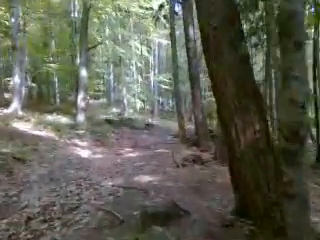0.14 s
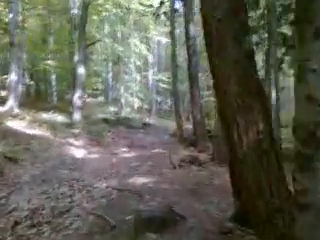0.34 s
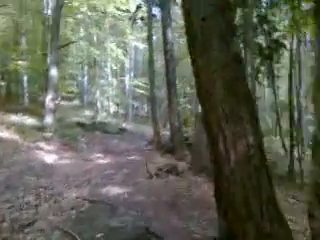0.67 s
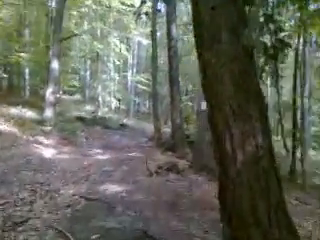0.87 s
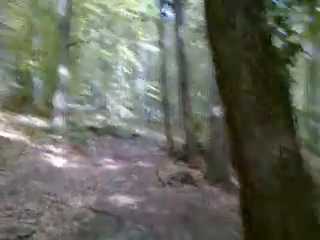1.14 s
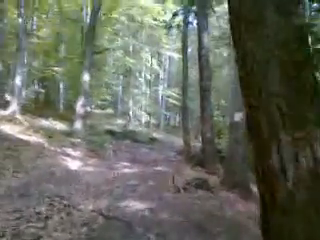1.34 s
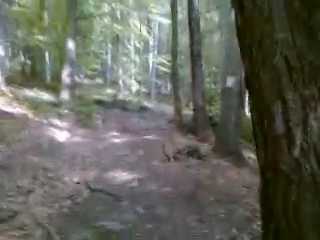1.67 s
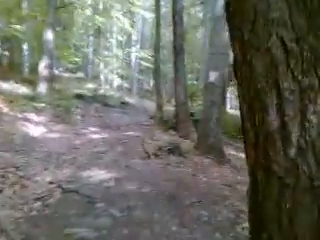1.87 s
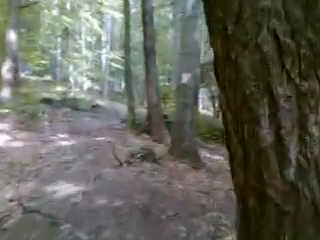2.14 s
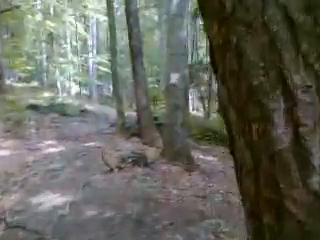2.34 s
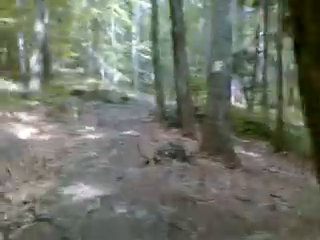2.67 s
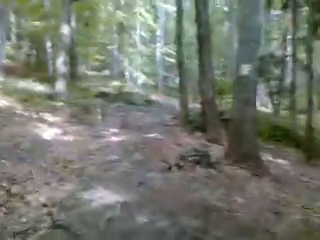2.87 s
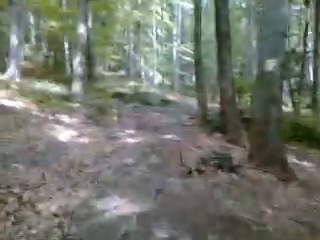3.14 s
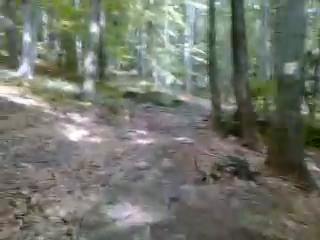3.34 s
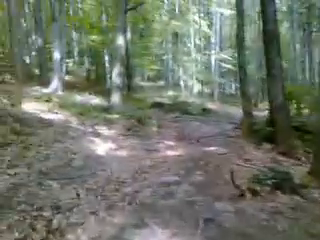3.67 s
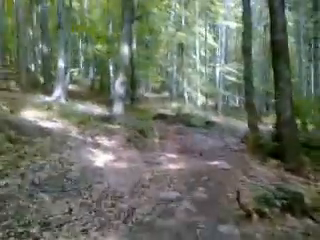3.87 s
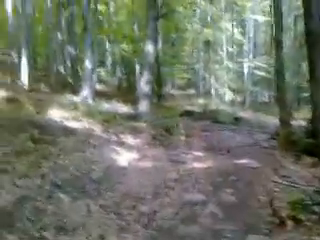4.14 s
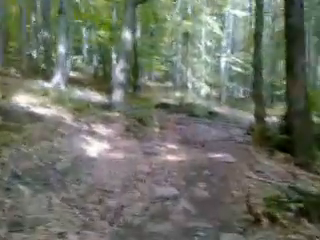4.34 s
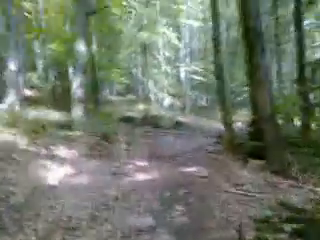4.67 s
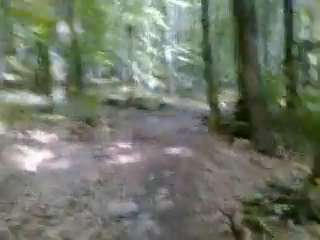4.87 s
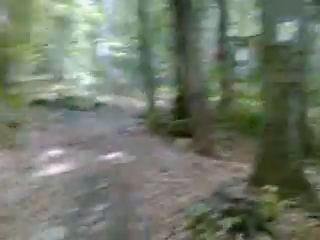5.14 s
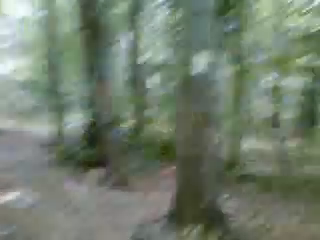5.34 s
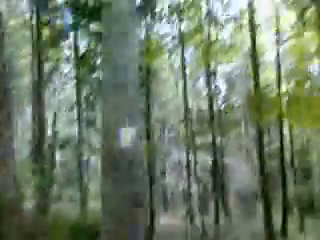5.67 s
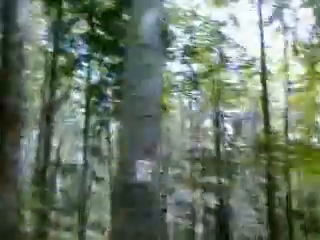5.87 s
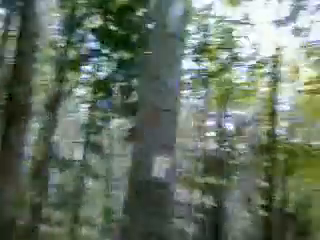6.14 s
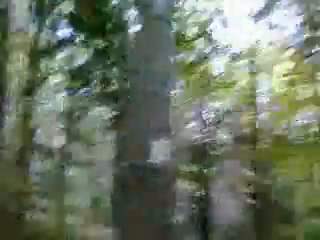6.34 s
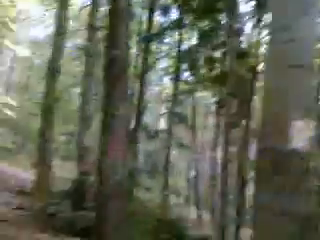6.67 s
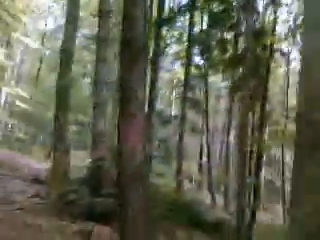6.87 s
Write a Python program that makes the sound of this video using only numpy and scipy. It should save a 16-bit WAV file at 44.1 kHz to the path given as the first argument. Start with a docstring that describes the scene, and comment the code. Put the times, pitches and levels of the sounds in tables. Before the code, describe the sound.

A walker moves along a quiet woodland path, heard from a carried microphone with a narrow, slightly rough treble. Faint leaf scuffs and a small twig click open the scene. From about 0.3 seconds a finch gives four short falling whistles, each louder, with a sharp twig crack near 0.6, then a fast trill from 0.8 to 1.2 and a buzzy, sliding flourish until about 2.3, all with diffuse woodland echo. Crunching leaves and soil swell between 1.3 and 2.0, then thin to sparse scuffs. Brittle snaps strike around 3.25 and 4.1. From 4.3 the steps grow denser, with a cluster of cracks near 4.7 and a strong snap at 5.2, plus low thuds around 5.5 and 6.0. Scuffing continues to the end, where another bird gives quick high chirps at 6.7 to 6.95. Soft air and slight handling rumble remain underneath.

```python
"""A walker treads a forest path: shoes scuff dry leaves and soil, twigs snap and feet thud throughout.
A finch soon opens with four rising-level whistles, then sings a fast trill and a buzzy flourish.
Steps carry on, crunchy noise with short cracks and low thumps, until a second bird chirps near the end.
Birds are gliding sine tones with a diffuse echo. Soft air lies under all, and thumps bring rumble.
The overall tone has two treble peaks, narrow dips and a steep top end."""
import sys
import numpy as np
from scipy import signal
from scipy.fft import rfft, irfft, next_fast_len
from scipy.io import wavfile
from scipy.ndimage import uniform_filter1d, map_coordinates

SR = 44100
rng = np.random.default_rng(int(sys.argv[2]) if len(sys.argv) > 2 else 0)


def natural_amplitude(level_db):
    """Convert a level in decibels to a linear amplitude factor, elementwise."""
    exponent = np.asarray(level_db, float) / 20
    return 10 ** exponent


def bounce(signal):
    """Save signal as a 16-bit WAV file at the path given by the first command-line argument."""
    frames = np.transpose(np.atleast_2d(signal))
    limited = np.clip(frames, -1, 1)
    pcm = np.round(limited * 32767).astype(np.int16)
    wavfile.write(sys.argv[1], SR, pcm)


N = 308372

# The sole scuffing through litter, levels before the press curve:
# start_s, length_s, crisp_leaves_level_db, dull_soil_level_db
SCUFF_EVENTS = [(0.183, 0.053, -51, -53), (0.751, 0.041, -41.5, -44), (0.787, 0.38, -60, -61),
                (0.796, .045, -43, -64), (0.965, 0.05, -43, -37), (1.049, 0.21, -56.5, -51.5),
                (1.272, 0.08, -51.5, -53), (1.364, 0.056, -39, -34), (1.424, 0.093, -34.5, -41.5),
                (1.525, 0.24, -47, -47), (1.665, 0.14, -33, -34.5), (1.794, 0.082, -31, -35.5),
                (1.868, 0.14, -42, -77), (1.964, 0.085, -34, -61), (2.348, 0.031, -39.5, -58),
                (2.406, 0.046, -89, -48.5), (2.739, 0.075, -62, -56.5), (2.864, 0.038, -62.5, -42),
                (2.985, 0.01, -54, -43.5), (3.023, 0.097, -49, -56.5), (3.179, 0.049, -43, -58),
                (3.238, 0.022, -32, -31.5), (3.38, 0.036, -52, -48.5), (3.522, 0.027, -49, -49),
                (3.982, 0.023, -47, -44.5), (4.019, 0.1, -59, -51), (4.106, 0.041, -28, -30),
                (4.277, .12, -35.5, -36.5), (4.451, 0.08, -43, -50.5), (4.685, 0.067, -37, -46.5),
                (4.764, 0.028, -28, -33.5), (4.86, 0.055, -40, -42.5), (4.966, 0.039, -46.5, -51),
                (5.083, 0.056, -39.5, -69.5), (5.135, 0.07, -41.5, -69.5), (5.19, 0.065, -33, -37),
                (5.266, 0.096, -32.5, -43), (5.476, 0.062, -32, -32), (5.546, 0.15, -43, -50.5),
                (5.667, 0.079, -43, -37.5), (5.723, 0.1, -42, -46), (5.813, 0.12, -45.5, -48.5),
                (5.948, 0.04, -73, -44), (5.992, 0.064, -36, -44), (6.186, 0.12, -51.5, -50.5),
                (6.389, 0.13, -35.5, -40), (6.487, 0.1, -42.5, -46.5), (6.645, 0.071, -43, -49.5),
                (6.729, 0.043, -65.5, -48), (6.78, 0.093, -42, -42)]
# Twigs and leaf ribs breaking, relative crack and knock levels: start_s, crack_level_db, knock_level_db, knock_hz
SNAP_EVENTS = [(0.157, -48.5, -46, 820), (0.1976, -46, -41, 800), (0.2147, -31, -63, 1540),
               (.336, -46, -46.5, 1650), (0.5254, -62, -40.5, 1920), (0.5828, -11.5, -26, 2330),
               (1.1685, -41, -24, 1680), (1.293, -32.5, -35.5, 1160), (1.381, -26, -23, 1390),
               (1.4488, -18, -10, 2330), (1.505, -32, -27, 1230), (2.183, -50, -41, 1760),
               (2.791, -43, -51, 1460), (3.2532, -11, -12, 1207), (3.3648, -37.5, -46, 1690.0),
               (3.462, -78.5, -39.5, 1000), (3.711, -53, -25.5, 965), (4.1162, -17.5, -19.5, 1880),
               (4.5227, -38, -27.5, 1490), (4.668, -56, -37, 3750), (4.6925, -14, -53, 1800),
               (4.712, -12.5, -17.5, 1450), (4.7282, -34, -25, 880), (4.772, -3.5, -18, 1360),
               (4.8887, -26, -21.5, 1770), (5.0231, -48.5, -32, 1680), (5.2092, -5, -9, 1730),
               (5.4741, -52, -39, 1250), (5.4901, -36, -26, 900), (5.993, -55, -24.5, 1810),
               (6.388, -29, -54, 1560), (6.401, -20.5, -35, 1510), (6.788, -25.5, -26.5, 1140)]
# Low thumps of the steps and the low body of some snaps, levels at the source:
# start_s, peak_level_db, pitch_hz
THUMP_EVENTS = [(0.049, -39, 270), (1.078, -39.5, 595), (1.127, -37.5, 427), (1.167, -32, 784),
                (1.292, -38, 564), (1.38, -34, 420), (1.447, -24, 910), (2.109, -52, 160),
                (2.161, -47.5, 283), (2.66, -41, 370), (3.349, -40.5, 199), (3.402, -29.5, 216),
                (3.458, -45, 183), (3.706, -35.5, 230), (4.028, -35, 316), (4.056, -41, 189),
                (4.091, -39, 382), (4.589, -27.5, 191), (4.722, -30.5, 330), (5.203, -30.5, 450),
                (5.495, -23, 740), (5.895, -38, 280), (5.993, -22.5, 226), (6.554, -29.5, 243),
                (6.782, -35, 370), (6.881, -47, 293)]
# The pair of notes that the trill repeats, nominal pitch and level:
# delay_s, length_s, from_hz, to_hz, level_db, growth_per_repeat_db
TRILL_PAIR = [(0, 0.016, 3980, 3554, -38, 1.16), (0.014, 0.023, 2910, 3545, -38, 0.5)]
# Single clear whistles, nominal pitch and level: start_s, length_s, from_hz, to_hz, level_db
CLEAR_WHISTLES = [(1.218, 0.029, 3806, 3980, -33), (1.239, 0.075, 4750, 4640, -43),
                  (1.268, 0.017, 3440, 3695, -29), (6.724, 0.021, 3650, 5400, -41.5),
                  (6.745, 0.0232, 4950, 4220, -34.5), (6.886, 0.022, 3520, 5400, -36),
                  (6.904, 0.02, 4850, 3850, -34.5), (6.934, 0.018, 5170, 5830, -44.5)]
# Buzzy notes, nominal pitch and level: start_s, length_s, from_hz, to_hz, level_db
BUZZY_NOTES = [(.395, 0.091, 6300, 5570, -58), (.685, 0.11, 6350, 5450, -54),
               (1.29, 0.084, 3535, 2720, -35.5), (1.46, 0.17, 3530, 2950, -40), (1.9, .19, 3276, 4260, -41),
               (2.085, 0.12, 5640, 4610, -42), (2.17, 0.14, 3770, 2720, -44)]
# Tone of crisp leaves and twig cracks: frequency_hz, gain_db
LEAF_TONE = [(150, -38.5), (1200, -10), (2600, 0), (4000, 5.5), (7000, 4.5), (9000, -6.5)]
# Tone of dull soil under the sole: frequency_hz, gain_db
SOIL_TONE = [(110, -30.5), (200, -10), (700, -5), (1100, -3.5), (1900, 0), (3200, -10), (7000, -13)]
# Tone of the soil crumbling under the thumps: frequency_hz, gain_db
CRUMB_TONE = [(105, -28.5), (165, 2), (400, 4), (800, -5), (2500, -52)]
# Tone of the still forest air: frequency_hz, gain_db
AIR_TONE = [(20, -32), (40, -16), (60, 1.5), (100, -19), (170, -5.5), (450, -10), (1100, -18), (2500, -13)]
# Tone of the handling rumble: frequency_hz, gain_db
RUMBLE_TONE = [(20, -14.5), (45, -4.0), (75, -13.0), (95, -27.0), (140, -53)]
# Overall tone: two treble peaks, narrow dips at 7 and 8 kHz, steep top end: frequency_hz, gain_db
OVERALL_TONE = [(2600, -5.5), (3850, 1.5), (5200, -11.5), (6400, 0), (6850, -4.5), (7000, -27.5),
                (7300, -6), (7750, -15), (8000, -44), (8400, -17.5), (8800, -27.5), (9300, -85)]


def unit(x):
    """Scales a signal to an rms of 1."""
    return x / np.sqrt(np.mean(x ** 2) + 1e-20)


def coloured(x, points):
    """Causal minimum-phase filter through frequency_hz, gain_db points, built from the cepstrum."""
    m = 2 * next_fast_len(N // 2 + 8192)
    f, db = np.transpose(points)
    gain_db = np.interp(np.log(np.fft.rfftfreq(m, 1 / SR) + 1), np.log(f + 1), db)
    cepstrum = irfft(np.log(natural_amplitude(gain_db)), m)
    cepstrum[1:m // 2] *= 2
    cepstrum[m // 2 + 1:] = 0
    response = np.exp(rfft(cepstrum))
    return irfft(rfft(x, m) * response, m)[:N]


def add(into, start_s, x):
    """Mixes x in from its start time."""
    part = into[round(start_s * SR):][:len(x)]
    part += x[:len(part)]


def wobble(rate):
    """A smooth random curve with rate knots a second."""
    knots = rng.standard_normal(int(N * rate / SR) + 4)
    return map_coordinates(knots, [np.arange(N) * rate / SR])


def hump(cycles, peak):
    """Swells to 1 after peak cycles, then dies."""
    return cycles / peak * np.exp(1 - cycles / peak)


def crunch(points, per_second, spread_db, hiss, patchy_db):
    """Tiny breaks of uneven size on a hiss, in patches of time and frequency."""
    size_db = spread_db * np.minimum(rng.exponential(1, N), 4)
    breaks = (rng.random(N) < per_second / SR) * natural_amplitude(size_db) * rng.standard_normal(N)
    grains = unit(breaks) + hiss * rng.standard_normal(N)
    z = signal.stft(grains, nperseg=256)[2]
    field = uniform_filter1d(rng.standard_normal(z.shape), 6, 0)  # blur over frequency
    field = uniform_filter1d(field, 14, 1)  # blur over time
    patchy = signal.istft(z * natural_amplitude(patchy_db * unit(field)), nperseg=256)[1][:N]
    return unit(coloured(patchy, points))


def echoes(x, t60, gap):
    """The scattered answer of the trunks: a decaying noise tail of energy 1, after a gap in seconds."""
    t = np.arange(SR) / SR
    tail = rng.standard_normal(SR) * natural_amplitude(-60 * t / t60) * (t > gap)
    return signal.fftconvolve(x, tail / np.linalg.norm(tail))[:N]


def scuffs():
    """The sole presses harder up to a peak, eases off and lifts; disturbed leaves rustle on."""
    roll_share, break_share = 0.61, 0.05  # share of a scuff before its peak
    loud_snap_db, snap_within_s = -26, .012
    settle_db, settle_t60_s = -26.5, 0.5
    crisp, dull = np.zeros(N), np.zeros(N)
    loud = np.array([s for s, crack_db, *_ in SNAP_EVENTS if crack_db > loud_snap_db])
    for s, length, crisp_db, dull_db in SCUFF_EVENTS:
        t = np.arange(round((length + 0.93) * SR)) / SR
        # the sole rolls on, or a loud twig gives way at once under it
        breaks = np.any((loud > s) & (loud < s + snap_within_s))
        top = (break_share if breaks else roll_share) * length
        press_times = [0, top, length, length + 0.018, length + 0.031]
        press = natural_amplitude(np.interp(t, press_times, [-11.5, -1.5, -9.0, -27.5, -48.5]))
        press += natural_amplitude(settle_db - 60 * np.maximum(t - length, 0) / settle_t60_s)
        press *= 1 - np.exp(-t / 0.0072)  # soft onset
        add(crisp, s, natural_amplitude(crisp_db) * press)
        add(dull, s, natural_amplitude(dull_db) * press)
    leaves = crunch(LEAF_TONE, per_second=3000, spread_db=2.6, hiss=.8, patchy_db=3)
    soil = crunch(SOIL_TONE, per_second=1500, spread_db=2.6, hiss=.8, patchy_db=4)
    crisp_judder = natural_amplitude(2 * wobble(45))
    dull_judder = natural_amplitude(3.3 * wobble(30))
    return crisp * crisp_judder * leaves + dull * dull_judder * soil


def snaps():
    """Twigs break with a click and a brief noise burst, plus a wooden knock of a few cycles."""
    cracks, knocks, t = np.zeros(N), np.zeros(N), np.arange(SR // 30) / SR
    noises = rng.standard_normal((len(SNAP_EVENTS), len(t)))
    for (s, crack_db, knock_db, hz), noise in zip(SNAP_EVENTS, noises):
        fade = .8 * natural_amplitude(-60 * t / .0035) + 0.07 * natural_amplitude(-60 * t / .04)
        burst = 6 * (t == 0) + noise * fade
        add(cracks, s, natural_amplitude(crack_db + 12.5) * burst / np.linalg.norm(burst))
        overtone = 0.31 * np.sin(2 * np.pi * 1.62 * hz * t + noise[0])  # random phase
        ring = np.sin(2 * np.pi * hz * t) + overtone
        peak_cycles = .9 if knock_db > crack_db + 8 else .44  # longer where little cracks
        add(knocks, s - .0006, natural_amplitude(knock_db) * hump(hz * t, peak_cycles) * ring)
    return coloured(cracks, LEAF_TONE) + knocks


def thumps():
    """Steps and some snaps get a low body: a short rough push rings a few uneven low cycles."""
    out, t = np.zeros(N), np.arange(SR // 8) / SR
    noises = rng.standard_normal((len(THUMP_EVENTS), len(t)))
    for (s, db, hz), noise in zip(THUMP_EVENTS, noises):
        push = hump(hz * (t - .003).clip(0), 0.1) + 0.33 * noise * hump(t, 0.0072)
        b, a = signal.iirpeak(hz, 1.3, SR)
        knock = signal.lfilter(b, a, signal.lfilter(b, a, push))
        add(out, s, natural_amplitude(db) * knock / np.abs(knock).max())
    return out


def crumble():
    """Soil gives way under each thump: sparse crunch with a fast decay."""
    level_db, t60_s = -12.5, 0.18  # level is relative to the thump's
    weight, t = np.zeros(N), np.arange(SR // 3) / SR
    for s, db, _ in THUMP_EVENTS:
        decay = natural_amplitude(db + level_db - 60 * t / t60_s)
        add(weight, s, decay * (1 - np.exp(-t / 0.0045)))
    crumbs = crunch(CRUMB_TONE, per_second=210, spread_db=6.5, hiss=0.87, patchy_db=8.0)
    return weight * natural_amplitude(3.4 * wobble(60)) * crumbs


def ticks():
    """Faint crumbs and stalks settle at random times, each a very short damped tone."""
    out, t = np.zeros(N), np.arange(SR // 100) / SR
    for when, pitch, size in rng.random((160, 3)):
        hz = 500 * 10 ** pitch
        tick = hump(hz * t, 0.4) * np.sin(2 * np.pi * hz * t)
        add(out, when * N / SR, natural_amplitude(-65 + 14 * size ** 2) * tick)
    return out


def bird_notes():
    """Gliding sine whistles swell and fade; buzzy notes shake their pitch fast and start strong."""
    out = np.zeros(N)
    # a falling whistle sung four times, ever louder
    opening = [(.332 + k * .1425, .021, 5050, 3350, -61 + k * 5.5) for k in range(4)]
    trill = []
    for k in range(7):
        for delay, length, from_hz, to_hz, db, grows_db in TRILL_PAIR:
            trill.append((.821 + k * .0574 + delay, length, from_hz, to_hz, db + k * grows_db))
    shake = np.sin(2 * np.pi * 190 * np.arange(N) / SR + 1.5 * wobble(150))
    # notes, pitch swing in hz, share of the note before it is loudest
    groups = (opening + trill + CLEAR_WHISTLES, 0, .5), (BUZZY_NOTES, 450, 0.12)
    for notes, swing_hz, peak in groups:
        for s, length, from_hz, to_hz, db in notes:
            u = np.linspace(0, 1, round(length * SR))
            glide = (from_hz + (to_hz - from_hz) * u) * (1 + rng.normal(0, .01))
            hz = glide + swing_hz * shake[round(s * SR):][:len(u)]
            swell = np.sin(np.pi / 2 * np.interp(u, [0, peak, 1], [0, 1, 0]))
            level = natural_amplitude(db + rng.normal(0, 1.95))
            add(out, s, level * swell * np.sin(2 * np.pi * np.cumsum(hz) / SR))
    return out


def birds():
    """The song with its diffuse echo among the trunks, both fluttering in level fast and at random."""
    direct_db, echo_db = -5, -3
    song = bird_notes()
    near = song + .5 * echoes(song, t60=.06, gap=0)
    diffuse = sum(wobble(200) * echoes(song, t60=.5, gap=.01) for _ in range(3)) / np.sqrt(3)
    return natural_amplitude(direct_db + 0.69 * wobble(250)) * near + natural_amplitude(echo_db) * diffuse


def handling_rumble():
    """A brief swell of low filtered noise around each thump."""
    t = np.arange(N) / SR
    low = unit(coloured(rng.standard_normal(N), RUMBLE_TONE))
    swells = sum(natural_amplitude(0.69 * db) * np.exp(-((t - s) / 0.044) ** 2) for s, db, _ in THUMP_EVENTS)
    return natural_amplitude(-46) * swells * low


def forest_air():
    """Still forest air: faint coloured noise whose level sways slowly."""
    air = unit(coloured(rng.standard_normal(N), AIR_TONE))
    return natural_amplitude(-65.5 + 2.2 * wobble(1.0)) * air


def scene():
    """Steps with their bass thinned and a faint echo from the trunks, then birds, rumble and air."""
    steps = scuffs() + snaps() + thumps() + crumble() + ticks()
    # little of the steps arrives below 125 Hz
    steps = signal.lfilter(*signal.butter(3, 125, 'high', fs=SR), steps)
    step_echo = natural_amplitude(-28.0) * echoes(steps, t60=0.33, gap=0.0025)
    return (steps + step_echo + birds() + handling_rumble() + forest_air())[None]


def band_limit(x):
    """A steep low-pass at the top of the band."""
    return signal.sosfilt(signal.butter(12, 8770, fs=SR, output="sos"), x)


def record(dry):
    """Overall tone and band limit, with a trace of hiss."""
    heard = coloured(dry[0], OVERALL_TONE) + natural_amplitude(-103.5) * rng.standard_normal(N)
    return band_limit(heard[None])


dry = scene()
out = record(dry)
bounce(out)
```